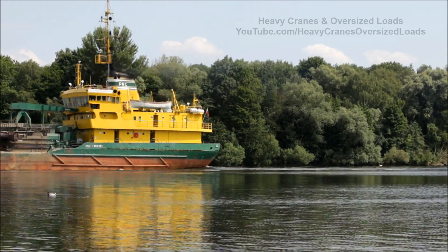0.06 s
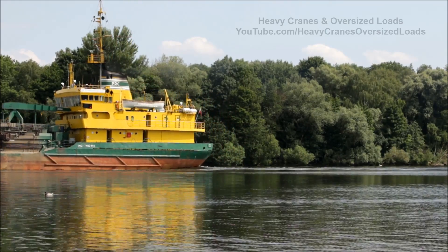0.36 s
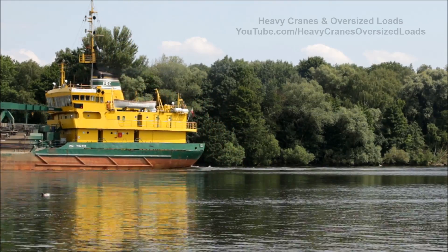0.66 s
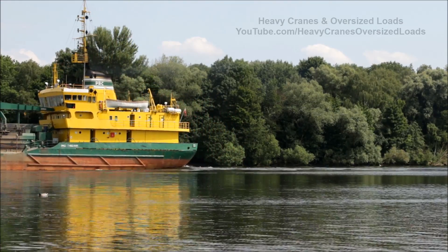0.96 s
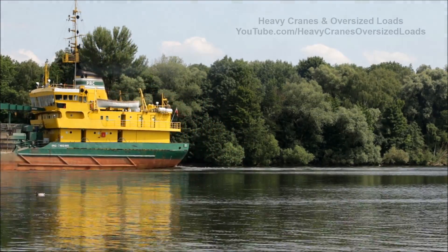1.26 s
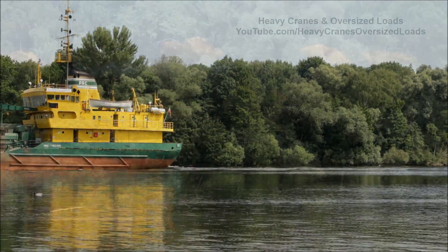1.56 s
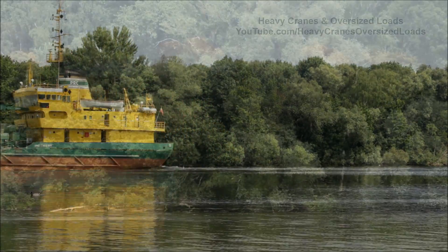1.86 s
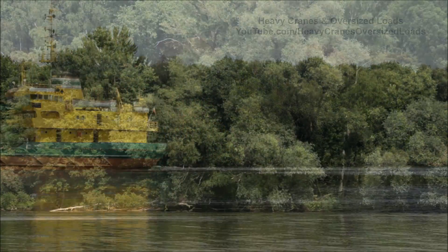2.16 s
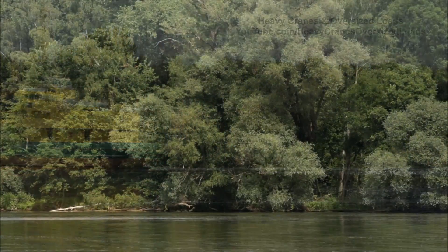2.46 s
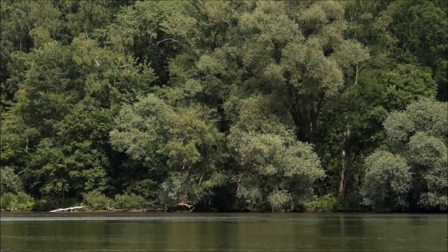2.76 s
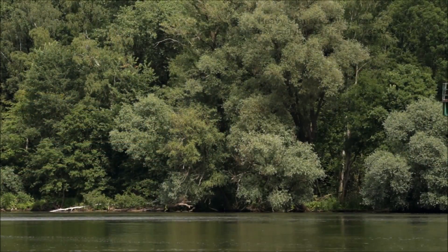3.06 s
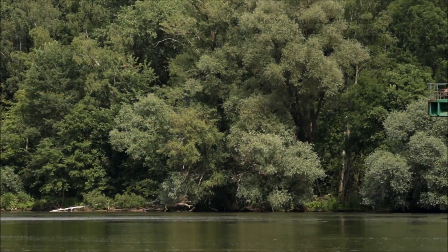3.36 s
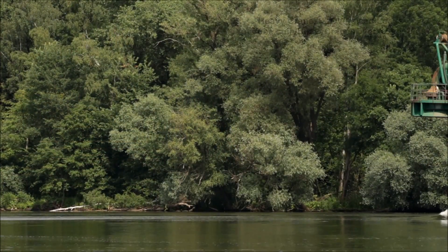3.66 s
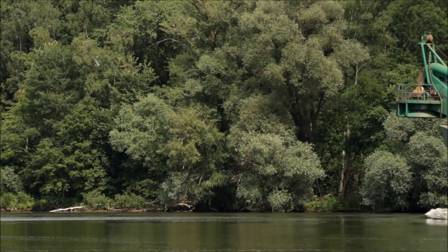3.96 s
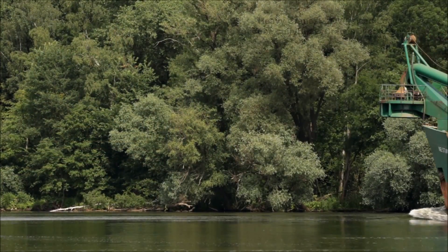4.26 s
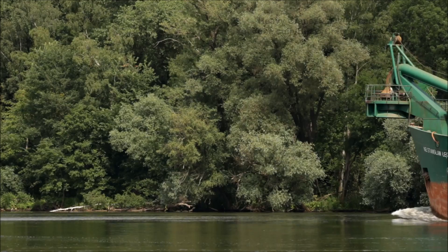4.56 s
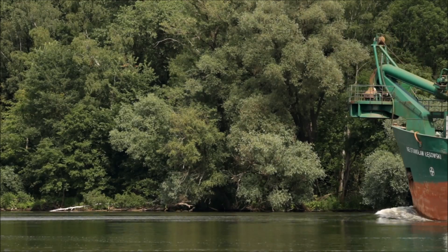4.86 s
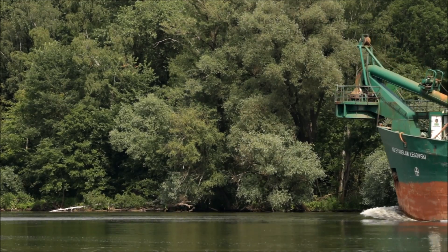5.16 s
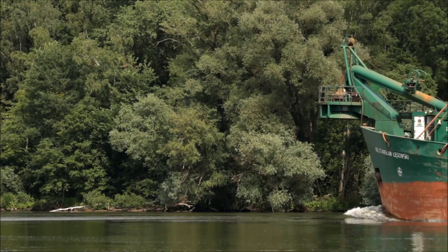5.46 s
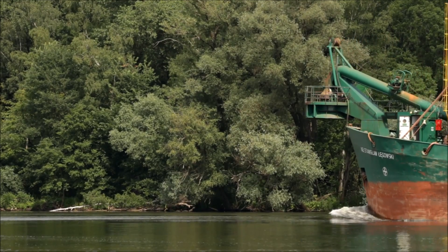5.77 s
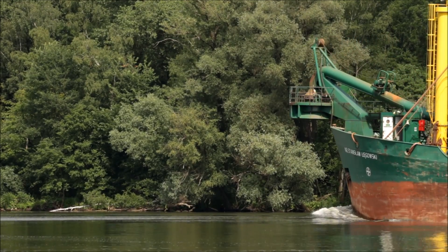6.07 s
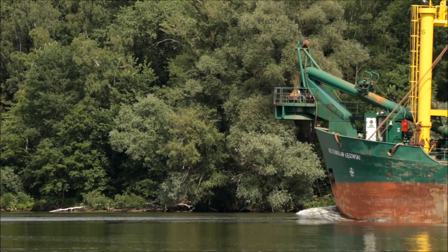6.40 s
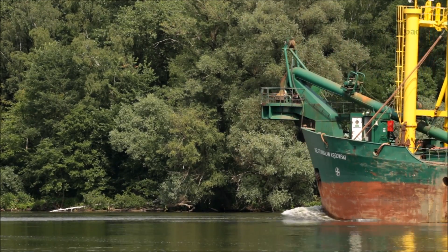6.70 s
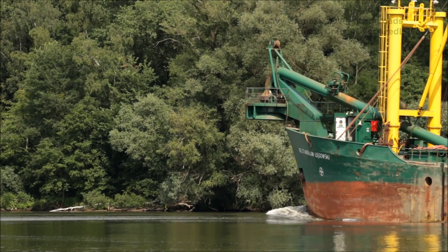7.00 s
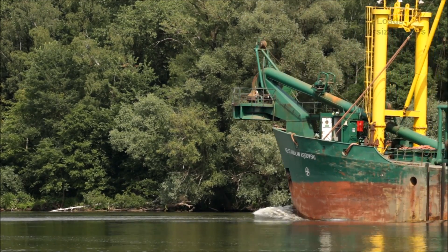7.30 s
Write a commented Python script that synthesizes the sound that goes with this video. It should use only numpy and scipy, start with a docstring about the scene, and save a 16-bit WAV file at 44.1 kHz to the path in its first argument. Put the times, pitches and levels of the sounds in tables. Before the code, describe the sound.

A large ship passes on a river with a loud throbbing drone, thudding diesel, rushing water and a few faint bird chirps.

```python
"""A loud, throbbing drone over a thudding diesel: a big work ship passes on a wooded river.
From the bank we hear it first from astern, with wind buffeting mostly the left microphone port, then
from ahead, with its bow wave foaming; the two views overlap. The exhaust pulses with the crankshaft,
machinery and wash roar, and deck fans whine faintly. Leaves hiss all round, small birds chirp with an
echo off the trees, a few sharp ticks sound close by, and a tiny edit click ends the astern view."""
import sys
import numpy as np
from scipy import signal
from scipy.fft import rfft, irfft, next_fast_len
from scipy.io import wavfile
from scipy.ndimage import uniform_filter1d, map_coordinates

SR = 44100
rng = np.random.default_rng(int(sys.argv[2]) if len(sys.argv) > 2 else 0)


def int16_out(signal):
    """Quantize to a 16-bit WAV file."""
    q = np.round(np.clip(np.atleast_2d(signal).T, -1, 1) * 32767)
    wavfile.write(sys.argv[1], SR, q.astype(np.int16))


N = 332514

# The drone's bed between throbs. Each row: time in seconds, level in dB, pitch in Hz.
DRONE_BED = [(0, -31, 276), (.6, -32, 277.5), (1.3, -33, 277), (1.7, -29, 273.5), (2.1, -31, 272.5),
             (2.5, -35, 272.5), (2.9, -33, 273), (3.4, -35, 273), (3.8, -30.5, 273), (4.1, -30.5, 273.5),
             (4.4, -34, 274), (4.75, -30, 273.5), (5.1, -31.5, 273), (5.55, -32, 273.5), (6.1, -32, 273.5),
             (6.4, -38.5, 275), (6.85, -39, 273), (7.54, -37, 272)]
# Swells on top of the bed. Each row: crest in seconds, length in seconds, level in dB.
DRONE_THROBS = [(.125, .17, -28), (.31, .17, -29.5), (.465, .17, -24), (.55, .11, -29), (.69, .22, -24),
                (.885, .22, -23.4), (1.275, .11, -28.5), (1.39, .15, -22.6), (1.475, .12, -22.6),
                (1.585, .14, -23.5), (1.70, .13, -24.6), (1.81, .13, -24.2), (1.9, .11, -24.2),
                (1.99, .15, -26.8), (2.24, .15, -26), (2.395, .19, -22.8), (2.66, .2, -21.4),
                (2.78, .13, -26.5), (3.03, .17, -25.2), (3.31, .14, -32), (3.58, .24, -30),
                (3.86, .16, -33), (4.24, .12, -30.5), (4.34, .08, -31), (4.62, .14, -29.5),
                (4.99, .18, -28.8), (5.285, .16, -26.5), (5.70, .16, -27.8), (5.83, .26, -24.6),
                (5.97, .16, -31), (6.25, .23, -22), (6.64, .21, -21.8), (7.025, .24, -23.6),
                (7.21, .2, -28), (7.43, .24, -24.4)]
# Split-second dropouts of the tone. Each entry: time in seconds.
DRONE_DIPS = [.2, .395, .61, 1.01, 1.325, 1.525, 2.105, 2.31, 2.5, 3.405, 4.39, 7.32]


def drone():
    """The ship's loudest voice: one firm tone that ripples quickly, swells in round throbs and dips."""
    ripple_db, ripple_hz, ripple_crest_s = 2, 7.4, 4.07
    dip_half_s, wander_hz = .015, 1.2
    t = clock()
    bed_db, hz = curves(DRONE_BED)
    bed = amp(bed_db + ripple_db * np.cos(2 * np.pi * ripple_hz * (t - ripple_crest_s)))
    soft_arch = lambda crest, length: np.clip(1 - (2 * (t - crest) / length) ** 2, 0, 1) ** 1.6
    throbs = sum(amp(db) * soft_arch(crest, length) for crest, length, db in DRONE_THROBS)
    dips = np.prod([np.abs(np.tanh((t - s) / dip_half_s)) for s in DRONE_DIPS], axis=0)
    flutter = amp(.3 * wobble(20))  # fading over the water
    gain = np.hypot(bed, throbs) * dips * flutter
    tone = np.sqrt(2) * gain * sine(hz + wander_hz * wobble(7))
    fuzz = amp(-46.5) * resonance(274.6, width_hz=17)
    return panned(tone + fuzz, left_db=1.73)


# Strong low hums from the engine and other machinery on board.
# Each row: multiple of the shaft rate, relative dB astern, relative dB ahead.
ENGINE_TONES = [(3, -56, -62.5), (5.95, -47, -43), (6.96, -50.5, -50), (8.96, -39.5, -39),
                (10.05, -51, -56), (10.94, -42.5, -40), (12.97, -43.5, -51), (13.64, -40.5, -45),
                (14.98, -39, -44.5), (16.98, -56, -47), (18.01, -45, -37), (27.03, -45, -44),
                (39.2, -56.5, -58.5), (44.94, -56, -52.5), (48.03, -56, -52.5)]
# EQ of the exhaust's thud. Each row: frequency in Hz, gain in dB.
EXHAUST_EQ = [(20, -30), (45, -5.5), (70, -8), (120, 2.5), (190, 1.5), (290, 2.5), (380, -7), (550, -8.5),
              (900, -32)]


def diesel():
    """A four-stroke's ragged exhaust repeats nearly alike each turn, under engine and machinery hums."""
    shaft_hz, astern_db, ahead_db = 8.157, -2, -.5
    stern, bow = views()
    gain = np.hypot(amp(astern_db) * stern, amp(ahead_db) * bow)  # louder while both views sound
    turns = np.cumsum(shaft_hz * (1 + .000507 * wobble(2))) / SR
    passing = np.clip((clock() - 2.8) / 2.9, 0, 1)  # the mix of hums shifts as the ship moves
    tones = np.zeros(N)
    for multiple, stern_db, bow_db in ENGINE_TONES:
        db = stern_db + passing * (bow_db - stern_db) + 1.63 * wobble(1.396)
        tones += amp(db) * np.sqrt(2) * np.sin(2 * np.pi * (multiple * turns + rng.random()))

    def ragged(cycles, size):
        loop = np.interp(cycles % 1, np.linspace(0, 1, size), rng.standard_normal(size))
        return unit(filtered(loop, lambda hz: amp(along(EXHAUST_EQ, hz))))

    each_turn = ragged(turns, size=1024)
    every_two_turns = amp(-6) * ragged(turns / 2, size=2048)
    exhaust = amp(-38.5) * unit(each_turn + every_two_turns)
    return panned(gain * (tones + exhaust), left_db=1.5)


# EQ of the roar in each view. Each row: frequency in Hz, gain in dB.
STERN_ROAR_EQ = [(25, -27), (70, -4.5), (270, 6.5), (350, -4), (460, -9.5), (650, -6.5), (900, -11.5),
                 (1060, -12), (1230, -16.5), (1550, -16), (2100, -20.5), (2800, -29), (4000, -31.5),
                 (8000, -51)]
BOW_ROAR_EQ = [(25, -19), (60, 0), (170, -0.5), (300, 2), (420, -9), (550, -7.5), (740, -13), (880, -15),
               (1010, -12), (1230, -18), (1500, -15.5), (1900, -25), (2300, -27.5), (4200, -38.5),
               (8000, -48)]
# Fader rides for the roar in each view. Each row: time in seconds, level in dB.
STERN_ROAR_FADER = [(0, -34.5), (.95, -35.5), (1.2, -33.5), (1.35, -32.5), (1.55, -34), (2.75, -33.7)]
BOW_ROAR_FADER = [(1.3, -38.5), (2.8, -37.5), (3.3, -37.5), (4, -38), (4.5, -38), (5.2, -39), (7.54, -37)]
# Stereo image of the roar and bow wave. Each row: frequency in Hz, left-right coherence (1 is mono).
SHIP_COHERENCE = [(60, 0.95), (300, 0.95), (1400, 1), (4000, 0.57)]


def roar(eq, fader, bounce_ms):
    """Machinery and wash roar; a bounce off the near bank ripples the treble; the bass bends past."""
    def bank(hz):
        delay = np.exp(-2j * np.pi * np.outer(bounce_ms, hz) / 1000)  # left, right
        return 1 + .38 * hz / (hz + 600) * delay

    level_db, = curves(fader)
    gain = amp(level_db + .26 * wobble(10))
    direct = rush(eq, SHIP_COHERENCE, patchy_db=1)
    return panned(gain * filtered(direct, bank), left_db=1.1)


# EQ of the wind's rumble. Each row: frequency in Hz, gain in dB.
WIND_EQ = [(20, -27.5), (40, -2.5), (70, 3.5), (130, 2), (200, -5), (300, -14.5), (450, -28), (1000, -42.5),
           (3000, -73.5)]
# Short gusts. Each row: crest in seconds, boost in dB.
WIND_GUSTS = [(.14, 5), (.6, 4), (.9, 6), (1.29, 6.5), (1.55, 8), (1.7, 2.5), (1.87, 3.5), (2.13, 4)]
# Sharp wind pops, hard left. Each row: time in seconds, peak level in dB.
WIND_POPS = [(0.164, -5.5), (0.383, -9.5), (0.487, -13.5)]


def wind():
    """Eddies of a dying breeze buffet each microphone port on its own, the windward left one harder."""
    fall_db_per_s, gust_s, pop_s = 1.5, .033, .0012
    t = clock()
    breeze_db = -29.5 - fall_db_per_s * t
    gust_db = sum(db * np.exp(-((t - crest) / gust_s) ** 2) for crest, db in WIND_GUSTS)
    lean_db = np.outer([.5, -.5], np.interp(t, [1.2, 2.4], [10, 6.5]))
    lumps = amp(1.6 * np.array([wobble(25), wobble(25)]))
    eddies = unit(lumps * rush(WIND_EQ, coherence=[(100, .097)], patchy_db=-.5))
    swing = lambda u: u * np.exp((1 - u * u) / 2)  # one pull and push of air
    pops = sum(amp(db) * swing((t - s) / pop_s) for s, db in WIND_POPS)
    return amp(breeze_db + gust_db + lean_db) * eddies + np.outer([1, 0], pops)


# Fader ride for the bow wave. Each row: time in seconds, level in dB.
BOW_WAVE_FADER = [(1.3, -48), (2.8, -46.5), (3.5, -55.5), (4.4, -48.5), (5.2, -46), (6.1, -48.5),
                  (7.54, -49.5)]
# EQ of its foam. Each row: frequency in Hz, gain in dB.
BOW_WAVE_EQ = [(200, -20), (420, 4), (700, 5.5), (1100, -12.5), (1400, -2.5), (2000, -4.5), (2400, -19),
               (3000, -13.5), (4500, -34), (9000, -45)]


def bow_wave():
    """Water breaks and foams at the stem."""
    level_db, = curves(BOW_WAVE_FADER)
    return amp(level_db + .5 * wobble(4.6)) * rush(BOW_WAVE_EQ, SHIP_COHERENCE, patchy_db=.5)


# Fan whines. Each row: pitch in Hz, half width in Hz, level in dB at the 4-second mark.
FAN_WHINES = [(532, 16, -52), (995, 42, -53.5), (1056, 8, -57.3), (849, 3, -66)]


def fans():
    """Ventilators whine unsteadily on deck and grow as the ship nears."""
    rise_db_per_s = .25
    nearing = amp(rise_db_per_s * (clock() - 4))
    whine = sum(amp(db) * resonance(hz, width) for hz, width, db in FAN_WHINES)
    return panned(nearing * whine, left_db=2)


# Swells of hiss. Each row: crest and half length in seconds, centre and half width in Hz, level in dB.
HISS_SWELLS = [(.4, .8, 3950, 150, -70), (.3, .5, 1700, 110, -58), (3.55, .35, 2500, 130, -62.5),
               (3.62, .35, 3350, 200, -65), (4.8, .6, 1900, 150, -58), (5.5, .4, 2900, 170, -64.5),
               (5, .7, 3550, 90, -72), (6, .35, 3600, 45, -69.5), (5.8, 2.2, 4450, 200, -71),
               (7.1, .8, 2800, 170, -66)]


def machinery_hiss():
    """Faint peaks in the ship's treble hiss come and go and shift as the ship glides along the bank, which
    throws the sound back."""
    hiss = np.zeros((2, N))
    for crest, half_length, hz, width, db in HISS_SWELLS:
        offset = (clock() - crest) / half_length
        swell = np.exp(-offset ** 2 / 2 - offset ** 4 / 2)
        centre = resonance(hz, width)
        sides = np.array([resonance(hz, width), resonance(hz, width)])
        hiss += amp(db) * swell * unit(centre + .5 * sides)
    return panned(hiss, left_db=.5)


# Close ticks, plus a tiny edit click where the astern view cuts off.
# Each row: start in seconds, level in dB, 60 dB decay in seconds, knock offset in dB.
TICK_HITS = [(1.649, -39, .006, -30), (1.6511, -30.5, .006, -30), (1.698, -52, .03, -20),
             (2.0707, -33.5, .007, -18), (2.075, -47, .008, -10), (2.076, -56, .5, -8),
             (2.083, -45.5, .012, -12), (2.10, -51, .025, -12), (2.147, -52, .012, -12),
             (2.747, -52, .005, 8), (2.83, -63.5, .8, -1), (2.858, -62, .035, 20)]
# EQs of the bright snap and the dull knock. Each row: frequency in Hz, gain in dB.
SNAP_EQ = [(2000, -32), (5200, -17), (6400, -5), (7900, 0), (9700, -4.5), (11700, -5), (13500, -11),
           (15500, -14)]
KNOCK_EQ = [(300, -6), (1400, -7), (2250, 5), (3200, -15), (4300, -9), (5500, -20), (7500, -17),
            (12000, -38)]


def ticks():
    """Close ticks and one edit click: bright, fast-dying bursts of noise, some with a duller knock."""
    t = clock()
    decay = lambda start, t60: (t >= start) * amp(-60 * np.abs(t - start) / t60)

    def bursts(envelope, eq):
        crackle = unit(rng.standard_normal((2, N)) + .5 * rng.standard_normal(N))
        return filtered(envelope * crackle, lambda hz: unit(amp(along(eq, hz))))

    snaps = sum(amp(db) * decay(start, t60) for start, db, t60, _ in TICK_HITS)
    knocks = sum(amp(db + knock_db) * decay(start, t60) for start, db, t60, knock_db in TICK_HITS)
    return bursts(snaps, SNAP_EQ) + bursts(knocks, KNOCK_EQ)


# EQ of the foliage. Each row: frequency in Hz, gain in dB.
LEAF_EQ = [(30, -0.5), (70, 17.5), (150, 5), (400, 9.5), (700, 5), (1300, 4.5), (2200, -0.5), (3500, -6.5),
           (5500, -10), (8000, -13), (11000, -16), (15500, -23)]


def leaves(level_db):
    """Leaves hiss all round in a wide, slightly uneven bed."""
    coherence = [(2000, .05), (5000, -.53), (9000, .013), (14000, -.05)]
    hiss = amp(level_db + .2 * wobble(8.2)) * rush(LEAF_EQ, coherence, patchy_db=.9)
    return panned(hiss, left_db=.2)


# A flick up and two falling notes. Each row: seconds into the call, base pitch in Hz, relative dB.
CALL_CONTOUR = [(0, 3300, -10), (.008, 3800, 0), (.016, 4500, -7), (.02, 4200, -30), (.029, 3550, -5),
                (.044, 3250, -30), (.058, 3120, 0), (.075, 2980, -1), (.092, 2850, -16)]
# Cues for that call. Each row: start in seconds, pitch ratio, level in dB, dry gain from 0 to 1,
# 60 dB echo decay in seconds, quaver as a share of the pitch.
CALL_CUES = [(4.957, .99, -49.3, .9, .2, .032), (6.515, 1.07, -48.5, .3, .45, .12)]


def bird_calls():
    """One bird calls twice, the second time higher, rougher and mostly as a long echo from the trees."""
    knots_s, hz, contour_db = np.transpose(CALL_CONTOUR)
    song = np.zeros((2, N))
    for start, ratio, db, dry_gain, t60, quaver in CALL_CUES:
        age = clock() - start
        envelope = np.interp(age, knots_s, amp(db + contour_db), left=0, right=0)
        call = envelope * whistle(ratio * np.interp(age, knots_s, hz), quaver)
        song += dry_gain * call + amp(-4) * tree_echo(call, t60)
    return song


# Small birds' peeps. Each row: start in seconds, top pitch in Hz, level in dB.
PEEP_CUES = [(.235, 3950, -62), (.275, 3900, -63), (.318, 6500, -62), (.342, 6600, -62),
             (.415, 6500, -58.5), (.436, 6500, -60.5), (.55, 6100, -64), (.685, 4600, -64),
             (.715, 4900, -64), (1.2, 4600, -66), (1.5, 4650, -63), (1.51, 7250, -64.5),
             (1.58, 7250, -62.5), (2.215, 5300, -68), (3.44, 5550, -66.5), (3.49, 5200, -68),
             (3.72, 4700, -66.5), (4.195, 4700, -67)]


def bird_peeps():
    """Small birds on the right whistle thin peeps that arch up and down in pitch."""
    length_s, pitch_sag = .02, .08
    song = np.zeros(N)
    for start, top_hz, db in PEEP_CUES:
        progress = np.clip((clock() - start) / length_s, 0, 1)
        hz = top_hz * (1 - pitch_sag * (2 * progress - 1) ** 2)
        song += amp(db) * np.sin(np.pi * progress) * whistle(hz, quaver=.026)
    return panned(song + tree_echo(song, t60=.14), left_db=-9)


def whistle(hz, quaver):
    """A bird's pure note with a fast, random shake in pitch."""
    return sine(hz * (1 + quaver * wobble(300)))


def tree_echo(x, t60):
    """The echo that the wooded banks scatter back, different left and right."""
    t = np.arange(SR // 2) / SR
    tail = rng.standard_normal((2, len(t))) * amp(-60 * t / t60)
    return signal.fftconvolve(x[None], tail / np.linalg.norm(tail[0]), axes=1)[:, :N]


def views():
    """Gains of the two views: the one from astern stops dead after the one from ahead has come in."""
    stern_end_s, bow_start_s = 2.75, 1.31
    t = clock()
    return np.clip((stern_end_s - t) / .0037, 0, 1), np.clip((t - bow_start_s) / .012, 0, 1)


def rush(eq, coherence, patchy_db):
    """Stereo noise of rms 1, shaped by an EQ, with patches of random gain in time and frequency."""
    spectra = signal.stft(rng.standard_normal((2, N)), nperseg=512)[2]
    patches = uniform_filter1d(rng.standard_normal(spectra.shape[1:]), size=6, axis=0)
    patches = uniform_filter1d(patches, size=16, axis=1)
    pair = signal.istft(spectra * amp(patchy_db * unit(patches)), nperseg=512)[1][:, :N]

    def mid_side_gains(hz):
        spread = np.arccos(np.clip(along(coherence, hz), -1, 1)) / 2
        return amp(along(eq, hz)) * [np.cos(spread), np.sin(spread)]

    mid, side = filtered(pair, mid_side_gains)
    return unit(np.array([mid + side, mid - side]))


def resonance(hz, width_hz):
    """A fuzzy tone of rms 1: noise in one sharp resonance."""
    return unit(filtered(rng.standard_normal(N), lambda f: 1 / (1 + ((f - hz) / width_hz) ** 2)))


def sine(hz):
    """An oscillator that follows a pitch curve."""
    return np.sin(2 * np.pi * np.cumsum(hz) / SR)


def wobble(rate):
    """A smooth random curve with rate knots a second."""
    return map_coordinates(rng.standard_normal(int(N * rate / SR) + 4), [clock() * rate])


def filtered(x, response):
    """x through a filter whose gain is response(hz)."""
    size = next_fast_len(N + SR // 2)
    return irfft(rfft(x, size) * response(np.fft.rfftfreq(size, 1 / SR)), size)[..., :N]


def along(points, hz):
    """Reads (Hz, value) points on a log frequency axis."""
    knots_hz, values = np.transpose(points)
    return np.interp(np.log(hz + 1), np.log(knots_hz + 1), values)


def curves(rows):
    """One automation curve for each column after the time."""
    times, *columns = np.transpose(rows)
    return [np.interp(clock(), times, column) for column in columns]


def panned(x, left_db):
    """x in stereo, leaning to the left by left_db."""
    return x * amp([[left_db / 2], [-left_db / 2]])


def amp(db):
    """Decibels to gain."""
    return 10 ** (np.asarray(db) / 20)


def unit(x):
    """x scaled to rms 1."""
    return x / np.sqrt(np.mean(x ** 2) + 1e-20)


def clock():
    """The time of each sample in seconds."""
    return np.arange(N) / SR


def scene():
    """The ship runs throughout; each view has its own roar and leaves, plus wind astern or foam ahead."""
    stern, bow = views()
    astern = roar(STERN_ROAR_EQ, STERN_ROAR_FADER, bounce_ms=(1.33, 1.27)) + leaves(-48.5) + wind()
    ahead = roar(BOW_ROAR_EQ, BOW_ROAR_FADER, bounce_ms=(1.13, 1.16)) + leaves(-49) + bow_wave()
    ship = diesel() + drone() + fans() + machinery_hiss()
    return ship + stern * astern + bow * ahead + bird_peeps() + bird_calls() + ticks()


def record(dry):
    """A quick fade at both ends and a brick-wall cut of the highest treble."""
    fade_s, top_hz = .006, 15780
    fades = np.clip(np.minimum(clock(), clock()[::-1]) / fade_s, 0, 1)
    return filtered(dry * fades, lambda hz: hz < top_hz)


dry = scene()
out = record(dry)
int16_out(out)
```